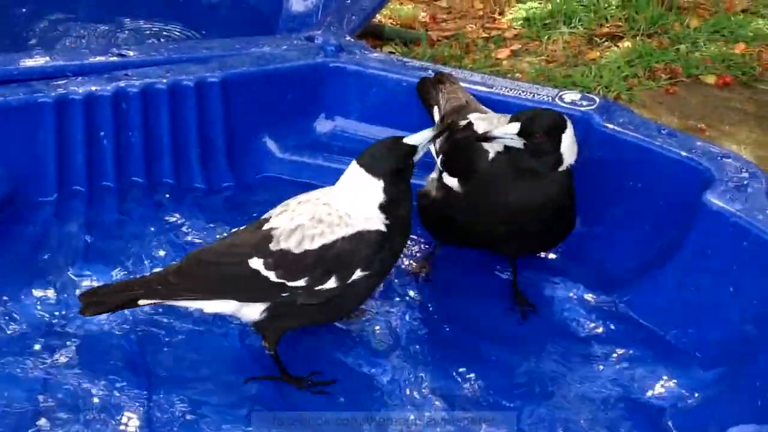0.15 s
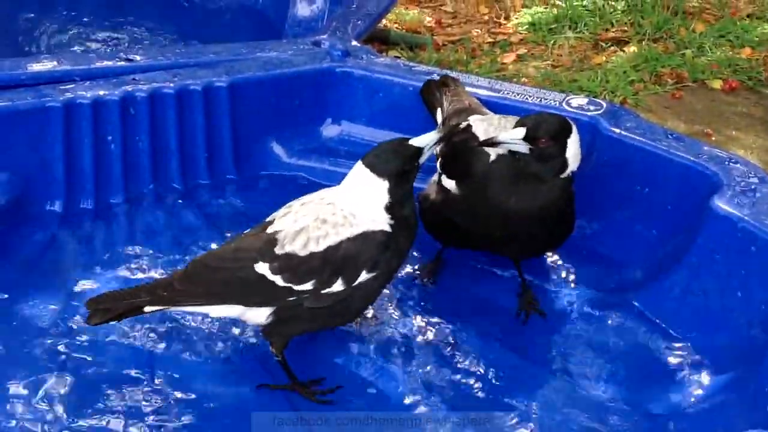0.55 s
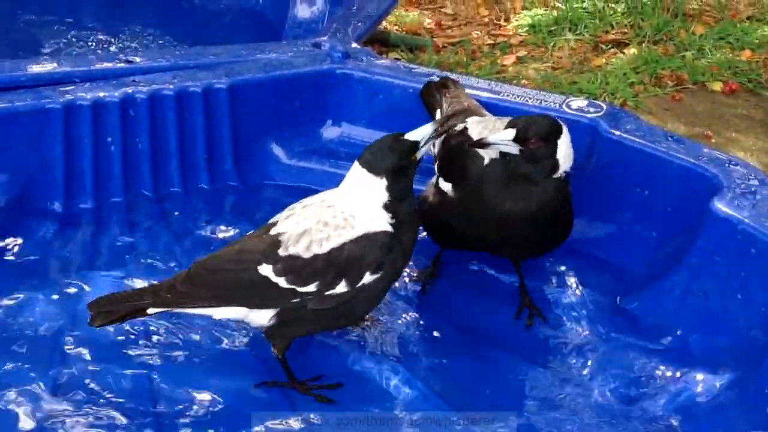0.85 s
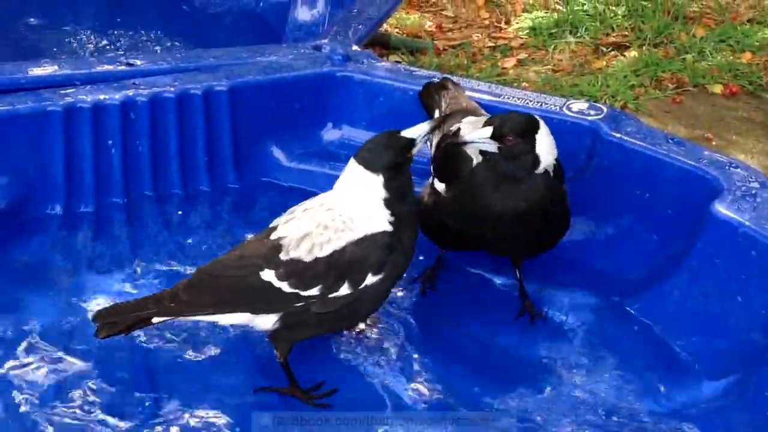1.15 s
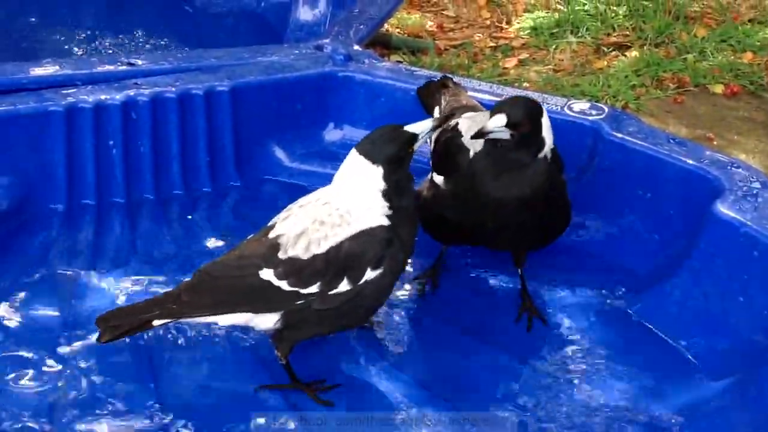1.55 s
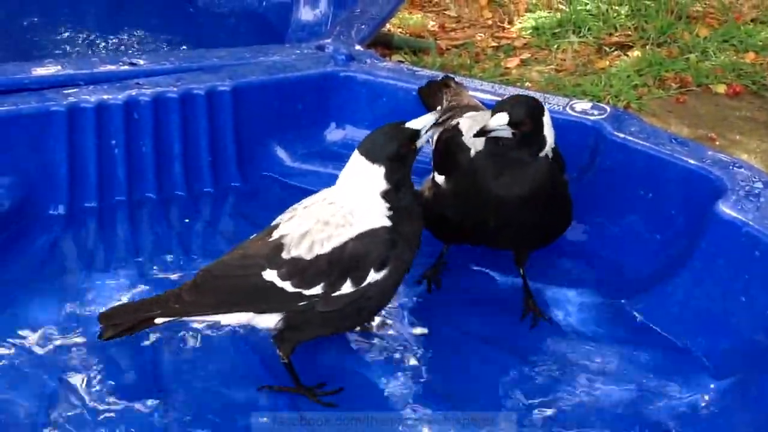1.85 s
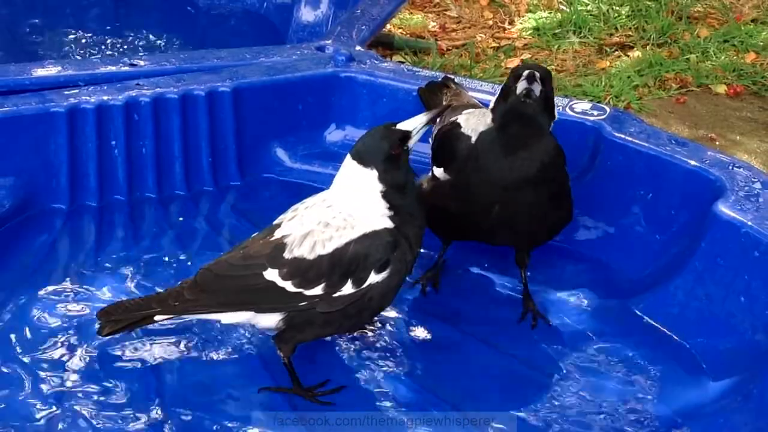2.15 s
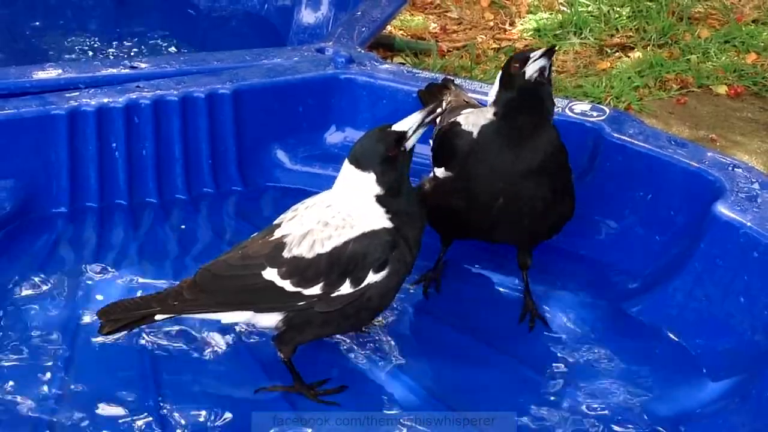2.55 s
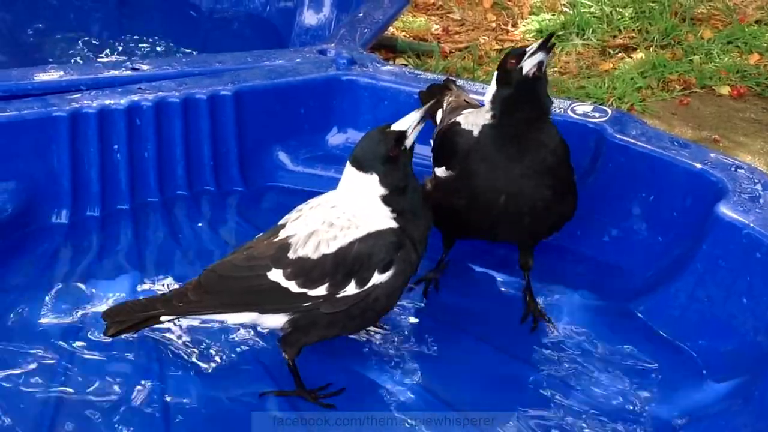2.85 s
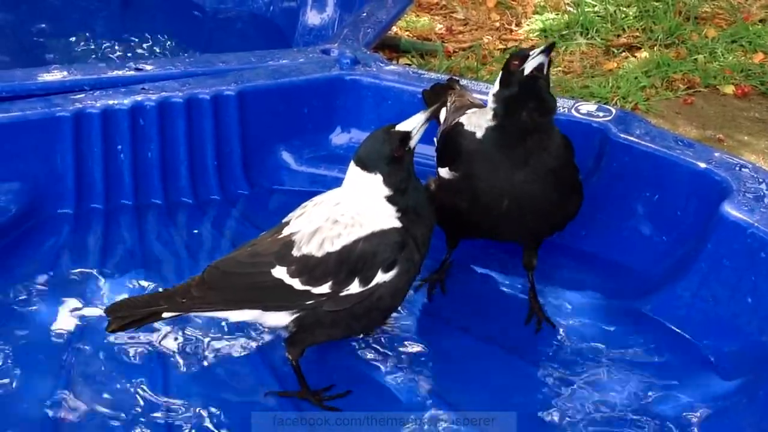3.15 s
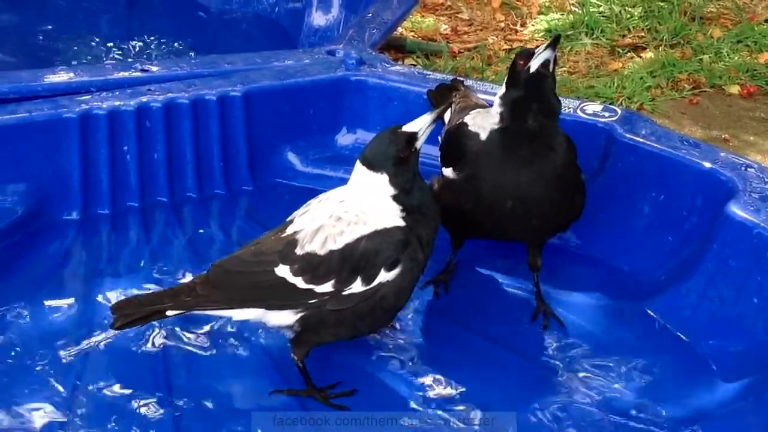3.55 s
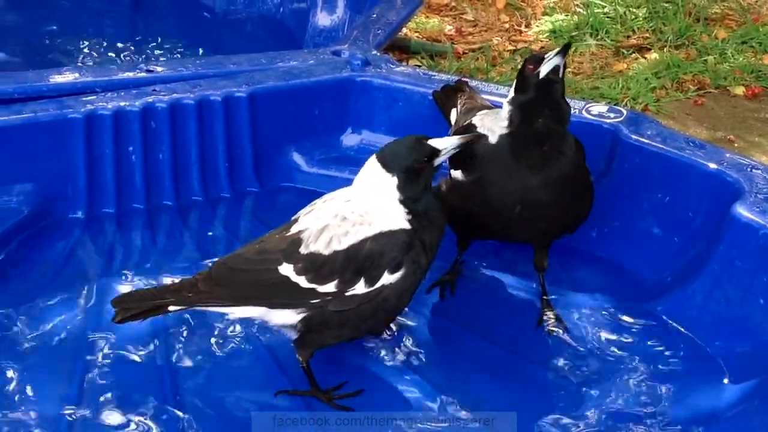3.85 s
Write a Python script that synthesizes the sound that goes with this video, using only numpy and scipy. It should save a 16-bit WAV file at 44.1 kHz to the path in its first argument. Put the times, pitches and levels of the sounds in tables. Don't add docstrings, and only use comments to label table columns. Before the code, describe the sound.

Magpies warbling close by, flutey notes turning raspy and rattling, over faint water ticks and garden hiss

```python
import sys
import numpy as np
from scipy import signal
from scipy.fft import rfft, irfft
from scipy.io import wavfile
from scipy.ndimage import uniform_filter1d

SR = 44100
rng = np.random.default_rng(int(sys.argv[2]) if len(sys.argv) > 2 else 0)


def to_wav(sig):
    pcm = np.clip(np.atleast_2d(sig), -1, 1) * 32767
    pcm = np.round(pcm).astype(np.int16)
    wavfile.write(sys.argv[1], SR, pcm.T)


def natural_amplitude(level_db):
    exponent = np.asarray(level_db, float) / 20
    return 10 ** exponent


N = 176400

# frequency in Hz, level in dB.
GARDEN_CURVE = [
    (24, -79),
    (55, -27),
    (202, -1),
    (1560, 5.5),
    (2510, -7),
    (15500, -7.5),
]
# start in seconds, peak in dB, frequency in Hz.
DROPS = [(0.1645, -28.5, 8860), (0.197, -34, 9160), (0.2369, -33, 9100), (0.2751, -25.5, 7600),
         (0.3447, -34, 8910), (0.3816, -28, 11470), (0.3977, -30, 9380), (0.7598, -31, 7150),
         (1.1228, -29, 12200), (1.3214, -38, 7500), (1.482, -31.5, 9090), (1.8458, -26, 8910),
         (1.8746, -34, 10500), (2.2131, -29.5, 8800), (2.6874, -33, 7740), (3.0967, -30.5, 8460),
         (3.2834, -33, 7300), (3.7808, -29, 12350)]
# start in seconds, peak in dB,
# frequency in Hz.
PLINKS = [(1.1078, -45, 4110), (1.123, -38, 3980), (1.3942, -49, 2440), (1.4247, -44, 2400),
          (1.5165, -51, 2540), (1.537, -53, 2800), (1.6624, -35, 4270), (3.5795, -38, 3250)]

# start in seconds, length in seconds, peak
# in dB, start pitch in Hz, end pitch in Hz.
EVEN_NOTES = [(0.0, 0.047, -35.5, 1010, 1187), (0.04, 0.016, -27, 734, 717),
              (0.075, 0.031, -34, 1220, 1310), (0.575, 0.0166, -22, 1572, 1655),
              (0.6, 0.014, -23, 1526, 1550), (0.69, 0.081, -45, 1037, 1004),
              (0.748, 0.015, -20, 1202, 1203), (0.878, 0.015, -17.1, 1630, 1437),
              (0.89, 0.15, -19, 1190, 1218), (1.205, 0.018, -18, 839, 727), (1.224, 0.011, -23, 834, 844),
              (1.568, 0.0194, -41, 723, 733), (1.62, 0.0328, -38, 1073, 1020),
              (1.828, 0.044, -46.5, 1110, 1183), (1.915, 0.024, -20.5, 1503, 1497),
              (1.91, 0.063, -41, 1030, 1210), (1.995, 0.032, -28, 1500, 1360),
              (2.005, 0.0222, -34, 1080, 966), (2.028, 0.012, -24.5, 1557, 1269),
              (2.062, 0.013, -25.5, 706, 824), (2.078, 0.016, -23.5, 980, 1160),
              (2.099, 0.02, -31.5, 900, 874), (2.116, 0.023, -26, 884, 896),
             (2.098, 0.0394, -39.5, 1800, 1834), (2.46, 0.025, -18.5, 716, 806),
             (2.618, 0.022, -19.5, 990, 1038), (2.678, 0.021, -25, 1796, 1880),
             (2.803, 0.0088, -18, 1730, 1688), (3.099, 0.039, -30, 1106, 964),
             (3.134, 0.087, -21.5, 709, 645), (3.35, 0.02, -14, 1782, 1620),
             (3.374, 0.021, -18.5, 1530, 1550), (3.39, 0.01, -20, 1268, 1247),
             (3.4, 0.0157, -15, 1319, 1305), (3.425, 0.017, -19.5, 1347, 1298),
             (3.412, 0.019, -15.5, 1004, 1063), (3.433, 0.025, -18.5, 1031, 970),
             (3.459, 0.067, -32.5, 2069, 2014), (3.775, 0.0425, -36, 853, 871),
             (3.815, 0.0298, -17, 1073, 1132)]
# start in seconds, length in seconds, peak in dB, start pitch in Hz, end pitch in Hz.
FADES = [(0.058, 0.022, -36.5, 710, 750), (0.655, 0.022, -17, 1026, 988), (0.762, 0.017, -23, 1290, 1280),
         (1.17, 0.019, -25.5, 740, 756), (1.898, 0.017, -16, 1670, 1650), (2.035, 0.026, -26, 964, 1090),
         (2.49, 0.0076, -23, 782, 880), (2.632, 0.021, -16, 1250, 1292), (2.758, 0.032, -32.5, 713, 860),
         (2.836, 0.1073, -18.5, 1243, 1222), (2.965, 0.052, -31, 1233, 1227), (3.102, 0.023, -25, 757, 750),
         (3.245, 0.022, -20.5, 871, 829.1), (3.855, 0.042, -35, 1118, 1120)]
# start in seconds, length in seconds, peak in dB, start pitch in Hz, end pitch in Hz.
ASIDES = [(.11, .06, -37, 1080, 1020), (1.068, .03, -39, 1000, 950), (1.198, .04, -43, 1800, 1850),
          (1.883, .008, -43, 3200, 2100), (1.982, .014, -32, 2150, 1800), (2.064, .014, -36, 1500, 1520),
          (2.112, .01, -31, 1720, 1700), (2.816, .017, -19, 1440, 1490), (2.825, .015, -33, 1100, 1230),
          (3.0, .04, -37, 1020, 1030), (3.343, .01, -38, 3700, 2000), (3.363, .045, -39, 2550, 2500)]
# start in seconds, length in seconds, peak in dB, start pitch in Hz, end pitch in Hz.
SWELLS = [(0.15, 0.055, -25.5, 1042, 1073), (0.6, 0.047, -28.5, 1122, 1257),
          (0.615, 0.048, -22.5, 1213, 1292), (0.632, 0.016, -18, 1078, 998), (0.762, 0.1, -19, 1644, 1718),
          (1.6, 0.0216, -27, 780.6, 780), (1.62, 0.062, -37.5, 805, 754), (1.785, 0.033, -21.5, 1046, 1156),
          (1.889, 0.015, -12.5, 1897, 1580), (1.935, 0.063, -32.5, 2356, 2250),
          (2.045, 0.018, -23.5, 757, 777), (2.145, 0.14, -26.5, 632, 667), (2.28, 0.039, -23.5, 1068, 1132),
          (2.495, 0.027, -20, 1733, 1635), (2.525, 0.11, -16, 1279, 1255), (2.65, 0.034, -25.5, 1976, 2230),
          (2.697, 0.13, -19.5, 1427, 1437), (2.85, 0.11, -15, 1012, 1011), (3.08, 0.022, -22.5, 732.3, 800),
          (3.218, 0.03, -19.5, 849, 782), (3.52, 0.056, -23.5, 1013, 992.2),
          (3.795, 0.037, -27, 1148, 1106), (3.975, 0.14, -22, 1074, 1090)]
# start in seconds, length in seconds, peak in dB, start pitch in Hz, end pitch in Hz.
THROBS = [(3.597, .016, -19, 800, 786), (3.613, 0.016, -14.5, 788, 798), (3.625, 0.019, -16, 801, 729),
          (3.643, 0.013, -15.5, 760, 778), (3.653, .02, -21, 774, 774), (3.674, 0.021, -33, 788, 756),
          (3.592, 0.0144, -36, 1690, 1640), (3.607, 0.011, -23, 1663, 1540),
          (3.615, 0.014, -37, 1618, 1715), (3.633, 0.038, -33, 1610, 1487), (3.86, 0.014, -29, 745, 750),
          (3.874, 0.022, -28.5, 753, 767), (3.895, 0.016, -27, 713, 740), (3.912, 0.01826, -23.5, 738, 728),
          (3.933, 0.017, -24, 725, 745), (3.952, .015, -26, 774, 764), (3.97, 0.0205, -32, 733, 783)]
# start in seconds, length in seconds, peak in dB, pitch in Hz, throbs per second.
TRILLS = [
    (0.222, 0.071, -29, 682, 76.7),
]
# start in seconds, length in seconds, level in dB.
HOARSE = [(0.615, 0.079, -38.5), (1.189, 0.054, -49.5), (1.702, 0.0924, -46), (2.019, 0.15, -47),
          (2.373, 0.081, -39), (2.442, 0.073, -44.5), (2.584, 0.063, -38), (3.216, 0.061, -40),
          (3.344, 0.073, -39.5), (3.395, 0.088, -33.5), (3.586, 0.1, -38), (1.906, 0.046, -46.5),
          (2.497, 0.06, -50.5), (2.654, 0.082, -49.5), (2.799, 0.08, -45)]
# centre in Hz, width in Hz, level in dB.
PIPE = [
    (1800, 2600, 1.5),
    (3830, 930, 4.5),
    (4930, 2250, -5.5),
    (8240, 2000, -8),
    (12280, 2900, -5),
]
# start in seconds, length in seconds, peak in dB, start beat in Hz, end beat in Hz.
RASPS = [
    (1.639, 0.1535, -39, 136.7, 147),
    (2.318, 0.15, -33.5, 219.3, 140.8),
]
# centre in Hz, width in Hz, level in dB.
THROAT = [
    (752, 314, 5),
    (1732, 119, -2),
    (3030, 1600, -24),
]

SWELL_SKEW, EVEN_SKEW, FADE_SKEW = 1.5, 1.05, .65


def walk(rate, size=N):
    k = int(SR / rate)
    steps = rng.standard_normal(int(4.2 * rate) + 2)[:size // k + 2]
    stairs = np.repeat(steps, k)
    return 2.25 * uniform_filter1d(uniform_filter1d(stairs, k), k)[:size]


def shaped(x, gain):
    x = irfft(rfft(x) * gain(np.fft.rfftfreq(N, 1 / SR) + 1), N)
    return x / x.std()


def coloured(gain):
    return shaped(rng.standard_normal(N), gain)


def peaks(hz, table):
    return np.sqrt(sum(natural_amplitude(db) ** 2 / (1 + (2 * (hz - f) / w) ** 2) ** 2 for f, w, db in table))


def add(out, at, x):
    i = max(int(at * SR), 0)
    out[i:i + len(x)] += x[:N - i]


def hump(length, skew):
    u = np.linspace(0, 1, int(length * SR))
    flat = 0.9 + length / 0.073
    arch = np.abs(np.sin(np.pi * u ** skew)) ** 1.1
    return u, np.tanh(flat * arch) / np.tanh(flat)


def garden():
    f, db = np.array(GARDEN_CURVE).T
    hiss = coloured(lambda hz: natural_amplitude(np.interp(np.log(hz), np.log(f), db, right=-60)))
    passing = np.exp(-((np.arange(N) / SR - .35) / 0.35) ** 2)
    traffic = natural_amplitude(-65.5 + 6.7 * passing) * coloured(lambda hz: peaks(hz, [(257.6, 207, 0)]))
    throb = natural_amplitude(-60 + walk(6.8) + 2.65 * walk(60))
    insects = throb * coloured(lambda hz: peaks(hz, [(2587, 538, 2), (4360, 660, -3.5)]))
    return natural_amplitude(-56 + walk(1.205)) * hiss + traffic + insects


def water():
    ticks_per_s, tick_db, spread_db, drop_db = 200, -46.5, 2.4, 4.5
    surge = walk(6.24)
    bubbles = []
    for when, rarity, size, damping in rng.random((int(4 * ticks_per_s), 4)):
        db = tick_db + 2 * surge[int(when * N)] - spread_db * np.log(rarity)
        bubbles.append((4 * when, db, 13500 / 3.15 ** size ** 2.06, damping))
    bubbles += [(at, db + drop_db, hz, .4) for at, db, hz in [*DROPS, *PLINKS]]
    out, t = np.zeros(N), np.arange(400) / SR
    for at, db, hz, damping in bubbles:
        decay = t * hz / (2 + 6 * damping ** 2)
        glide = 1 + 0.052 * np.minimum(decay, 2)
        ring = np.sin(2 * np.pi * hz * t * glide)
        add(out, at, natural_amplitude(db) * decay ** .5 * np.exp(-decay) * ring)
    return out


def tone(hz):
    return 2 * np.pi * np.cumsum(hz * (1 + 0.0015 * walk(91, len(hz)))) / SR


def flute(env, hz, db):
    size = len(env)
    phase = tone(hz) + 2 * np.pi * rng.random()
    env = env * natural_amplitude(.5 * walk(50, size) + .5 * walk(260, size))
    bloom = env ** 2 * np.linspace(.3, 1.2, size) ** 2
    effort_db = 0.86 * (db + 14.5)
    x = env * np.sin(phase)
    for k in range(2, 11):
        even_cut = -6.5 * ((k % 2 == 0) + (k == 2))
        k_db = -26 - 2 * k + even_cut + 9 * peaks(k * hz, PIPE)
        level = natural_amplitude(k_db + effort_db + 2.42 * walk(150, size)) * (k * hz < 15500)
        x = x + level * bloom * np.sin(k * phase)
    return natural_amplitude(db) * x


def notes():
    out = np.zeros(N)
    even = [*EVEN_NOTES, *THROBS, *ASIDES]
    for table, skew in ((even, EVEN_SKEW), (FADES, FADE_SKEW), (SWELLS, SWELL_SKEW)):
        for at, length, db, hz0, hz1 in table:
            u, env = hump(length, skew)
            add(out, at, flute(env, hz0 + (hz1 - hz0) * u, db))
    return out


def trills():
    out = np.zeros(N)
    for at, length, db, hz, rate in TRILLS:
        u, env = hump(length, EVEN_SKEW)
        throb = 0.26 + np.sin(np.pi * rate * u * length) ** 2
        add(out, at, flute(env * throb * 0.55, hz * (1.02 - u / 25), db))
    return out


def hoarse(song):
    env, crest = np.zeros(N), np.zeros(N)
    for at, length, db in HOARSE:
        shape = hump(length, EVEN_SKEW)[1]
        add(env, at, natural_amplitude(db) * shape ** 2)
        add(crest, at, natural_amplitude(db) * shape ** 6)
    z = signal.hilbert(song)
    slaps = np.exp(60 * (np.cos(np.angle(z)) - 1)) * natural_amplitude(4 * walk(400))
    effort = np.abs(z) / (uniform_filter1d(np.abs(z), 1500) + 1e-4)
    drive = np.tanh(effort ** .5 * slaps * (1 + .8 * rng.standard_normal(N)))
    low = shaped(drive, lambda hz: peaks(hz, PIPE[:3]) * hz / (hz + 3000))
    high = natural_amplitude(-9.5) * shaped(drive, lambda hz: peaks(hz, PIPE[3:]))
    puff = natural_amplitude(-37) * coloured(lambda hz: peaks(hz, [(45, 99, 0)]))
    return env * low + crest * (high + puff)


def rasps():
    out, rasp_hz = np.zeros(N), 883
    for at, length, db, hz0, hz1 in RASPS:
        u, env = hump(length, SWELL_SKEW)
        beat_hz = hz1 + (hz0 - hz1) * (1 - u) ** 2
        mid, beat = tone(np.full(len(u), rasp_hz)), tone(beat_hz)
        buzz = np.zeros(len(u))
        for k in range(1, 8):
            for j in range(-2, 3):
                level = peaks(k * rasp_hz + j * beat_hz, THROAT) * natural_amplitude(1.3 * walk(90, len(u)))
                buzz += level * np.sin(k * mid + j * beat)
        add(out, at, natural_amplitude(db) * env ** 2 * buzz)
    return out


def echo(near):
    t = np.arange(int(.3 * SR)) / SR
    tail = rng.standard_normal(len(t)) * np.exp(-np.log(1000) * t / .2) * (t > .006)
    return natural_amplitude(-10.5) * signal.fftconvolve(near, tail / np.linalg.norm(tail))[:N]


def scene():
    song = notes() + trills() + rasps()
    haze = 1 + natural_amplitude(-28) * walk(700)
    near = song * haze + hoarse(song) + water()
    return (near + echo(near) + garden())[None]


def roll_off(x):
    return signal.sosfilt(signal.butter(12, 15800, fs=SR, output="sos"), x)


def record(dry):
    mix = signal.sosfilt(signal.ellip(8, .2, 60, 15600, fs=SR, output="sos"), dry)
    return roll_off(mix)


dry = scene()
out = record(dry)
to_wav(out)
```